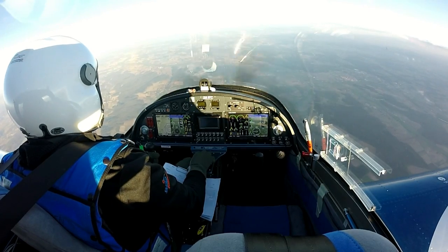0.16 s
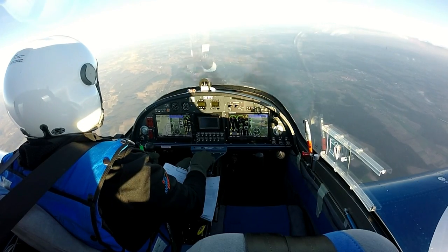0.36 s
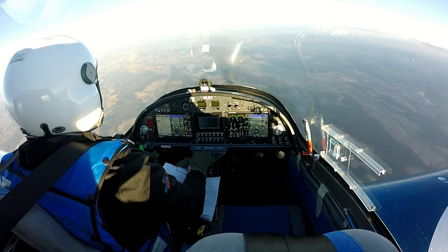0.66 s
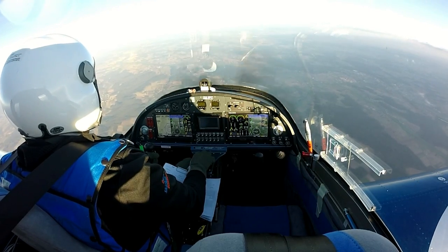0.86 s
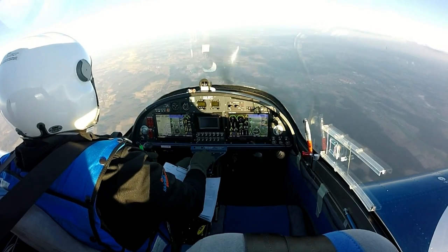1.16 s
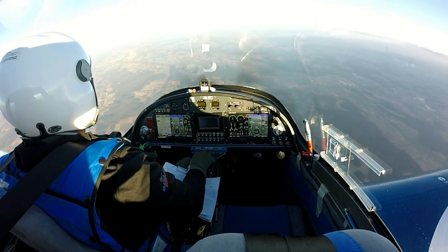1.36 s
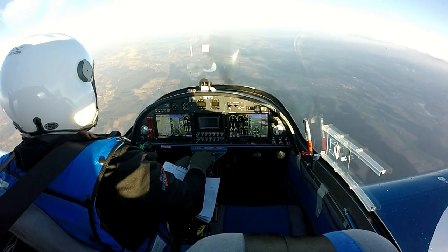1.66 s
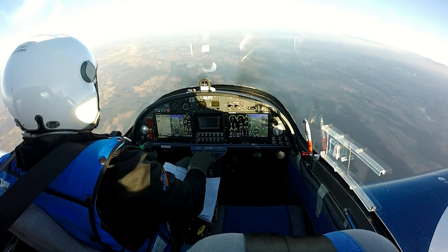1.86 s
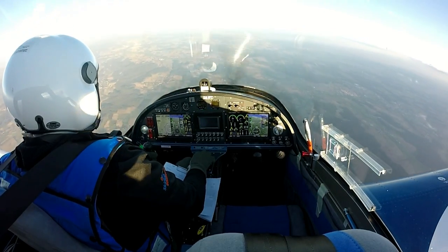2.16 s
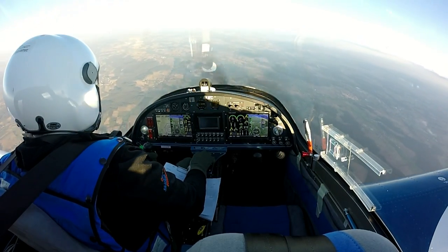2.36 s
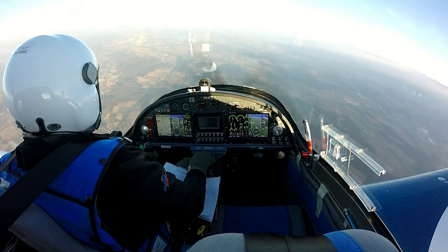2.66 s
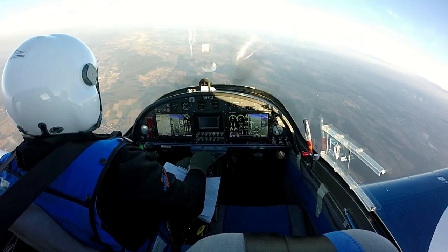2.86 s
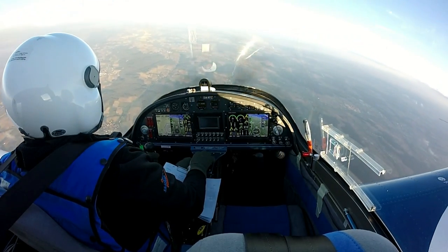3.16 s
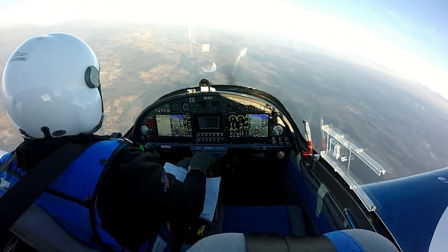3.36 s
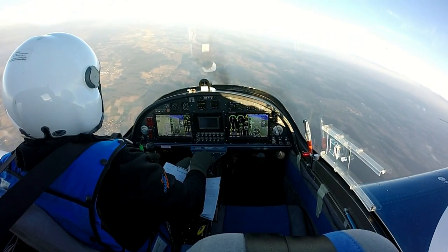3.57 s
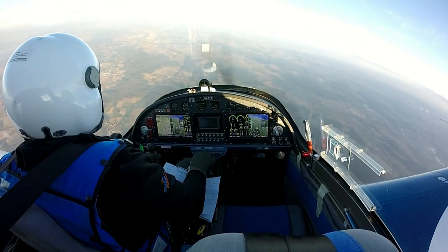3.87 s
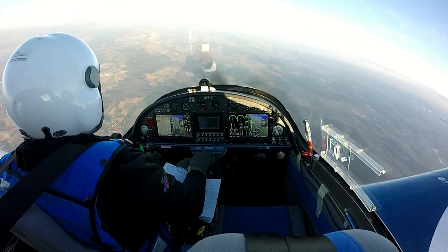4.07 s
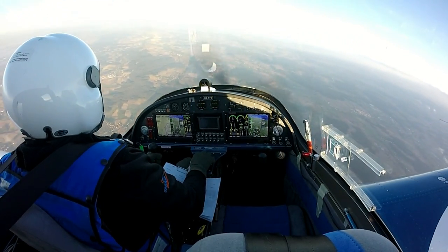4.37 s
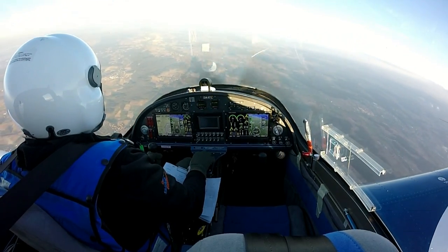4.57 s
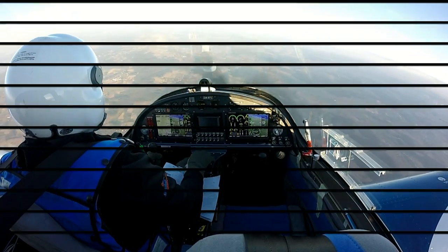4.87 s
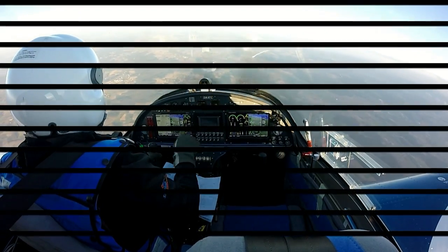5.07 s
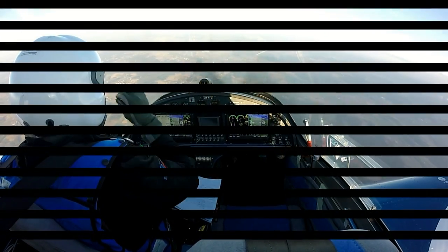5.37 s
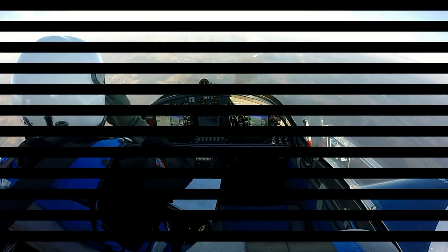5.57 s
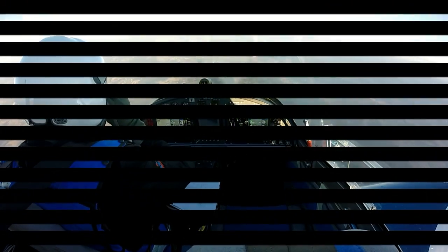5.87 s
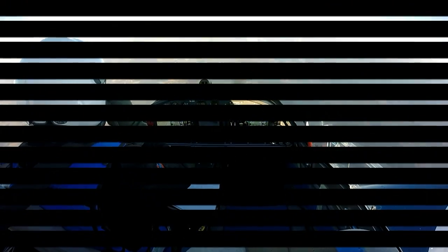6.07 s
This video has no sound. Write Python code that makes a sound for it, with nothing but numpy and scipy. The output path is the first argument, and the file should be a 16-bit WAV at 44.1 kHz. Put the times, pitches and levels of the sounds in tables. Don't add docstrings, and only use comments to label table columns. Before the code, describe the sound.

Inside a small propeller aircraft cockpit, a deep engine and propeller drone throbs under rushing air and low cabin rumble, then fades away.

```python
import sys
import numpy as np
from scipy import signal
from scipy.fft import rfft, irfft, next_fast_len
from scipy.io import wavfile
from scipy.ndimage import uniform_filter1d, minimum_filter1d

SR = 44100
rng = np.random.default_rng(int(sys.argv[2]) if len(sys.argv) > 2 else 0)


def volts(x):
    e = np.asarray(x, float) / 20
    return 10 ** e


def inscribe(sig):
    pcm = np.round(np.clip(np.atleast_2d(sig).T, -1, 1) * 32767)
    wavfile.write(sys.argv[1], SR, pcm.astype(np.int16))


N = 274690
SIZE = next_fast_len(N, True)

# time in seconds, blade-passing rate in Hz.
BLADE_RATE = [
    (0, 70.9),
    (.5, 71.2),
    (1.1, 71.8),
    (1.7, 71.9),
    (2.3, 72.5),
    (2.9, 73.1),
    (3.5, 73.6),
    (6.23, 73.8),
]
# frequency in Hz, density in dB per Hz.
AIR_LOW = [(20, -9.5), (32, -15), (50, -3), (62, 7), (88, 9.5), (105, -0.5), (130, 2), (165, -8.5),
           (190, -7.5), (330, -10.5), (390, -17), (600, -16.5)]
# frequency in Hz, density in dB per Hz.
AIR_HIGH = [(600, -19), (1000, -16.5), (1300, -21), (2300, -20.5), (2900, -29), (4100, -37.5),
            (6000, -36.5), (7200, -44), (8500, -51), (12000, -57.5), (14000, -63), (15000, -69.5)]
# centre in Hz, width in Hz, lift in dB.
CANOPY = [(255, 8.7, -3), (323, 33, 3), (547, 23, -5.5), (723, 45, -5.5), (751, 18, 6.5), (780, 28, -7.5),
          (1014, 45, 4.5), (1080, 50, -3.5), (1650, 350, 2.5), (1955, 140, -3.5), (2152, 100, 3),
          (3333, 280, 8), (4684, 160, 6), (5870, 300, 1.5), (13400, 600, 5)]
# time in seconds, depth in dB, fall and return in seconds.
LULLS = [(0, -9, .01, 0.23), (.28, -13, 0.056, 0.096), (.42, -6.5, 0.078, 0.067), (.55, -5, 0.095, 0.052),
         (.68, -8, 0.052, 0.032), (.76, -8, 0.035, 0.065), (.99, -9, 0.062, 0.041),
         (1.3, -7.5, 0.096, 0.095), (1.51, -5, 0.071, 0.053), (1.63, -19, 0.045, 0.058),
         (1.75, -17, 0.064, 0.037), (1.91, -13, 0.076, 0.06), (2.05, -2.5, 0.08, 0.33),
         (2.64, -0.5, 0.069, 0.13), (3.05, -8.5, 0.076, 0.055), (3.27, -3.5, 0.057, 0.056),
         (3.36, -6, 0.042, 0.12), (3.61, -6, 0.085, 0.085), (3.82, -3, 0.052, 0.22),
         (4.09, -5, 0.053, 0.088), (4.29, -3.5, .13, 0.087), (4.6, -3, 0.057, 0.035),
         (4.8, -3.5, 0.095, 0.084), (5.1, -1.5, .06, .06), (5.43, -9, .05, 0.084), (5.72, -3.5, 0.16, .08),
         (5.93, -5.5, 0.099, 0.046), (6.19, -2.5, 0.15, 0.031)]
# time in seconds, lift in dB,
# rise and drop in seconds.
LIFTS = [(0, 7.5, .01, 0.23), (.3, 5, 0.059, 0.14), (.48, 5.5, 0.11, 0.056), (.62, 7.5, .13, 0.02),
         (.8, 4, 0.27, 0.14), (1.02, 5, 0.061, 0.28), (1.34, 4.5, 0.11, 0.21), (1.78, 7, 0.39, 0.042),
         (1.93, 6.5, 0.11, 0.22), (2.13, 4.5, 0.093, 0.052), (2.31, 2, .12, 0.085), (2.46, 3, 0.051, 0.081),
         (2.62, -2, 0.088, .06), (2.8, 4, 0.13, .04), (2.92, 1.5, .1, 0.18), (3.09, 7.5, 0.059, .04),
         (3.45, 7, 0.22, 0.22), (3.63, 8, 0.11, 0.097), (3.75, 6.5, 0.12, 0.055), (3.84, 6.5, 0.046, 0.098),
         (3.95, 5.5, 0.1, 0.056), (4.13, 3.5, 0.12, 0.11), (4.38, 7, 0.14, 0.024), (4.65, 3.5, 0.23, 0.019),
         (4.85, 4.5, 0.085, 0.11), (5.1, 2, 0.27, .35), (5.49, 7, 0.1, 0.092), (5.78, 2.5, 0.33, 0.042),
         (5.96, 5, 0.068, 0.033), (6.12, -1.5, 0.36, .3)]
# time in seconds, lift in dB, rise and decay in seconds.
THUMPS = [(.07, 15.5, .07, 0.17), (.5, 7, 0.34, 0.22), (.78, 10.5, 0.25, 0.15), (1.06, 10, 0.19, 0.43),
          (1.44, 11.5, .06, .06), (1.54, 14, 0.072, .06), (1.67, 13.5, .05, .3), (1.92, 12, 0.12, .12),
          (2.12, 14, 0.12, 0.042), (2.25, 8, .04, .05), (2.36, -4, .06, .05), (2.5, 8.5, .1, 0.12),
          (2.7, -5, .08, .04), (2.78, 12.5, 0.043, 0.084), (2.96, 8, .04, 0.085), (3.09, 10.5, 0.071, .13),
          (3.4, 18.5, .14, 0.11), (3.63, 17.5, 0.099, 0.16), (3.87, 10, 0.046, 0.11),
          (3.97, 10.5, 0.12, 0.076), (4.15, 15.5, .06, 0.19), (4.41, 7, .04, .3), (4.83, 7.5, .05, .22),
          (5.1, 11, .04, 0.13), (5.5, 16, 0.29, .04), (5.63, 11.5, .04, 0.2)]

RUSH_DB = -43


def curve(table, column=1):
    rows = np.array(table)
    return np.interp(np.arange(N) / SR, rows[:, 0], rows[:, column])


def walk(rate):
    hold = int(SR / rate)
    levels = np.repeat(rng.standard_normal(N // hold + 1), hold)
    return 1.1 * uniform_filter1d(uniform_filter1d(levels, hold), hold)[:N]


def unit(x):
    return x / np.sqrt(np.mean(x ** 2))


def ring(hz, width_hz):
    f = np.fft.rfftfreq(SIZE, 1 / SR)
    resonance = 1 / (1 + (2 * (f - hz) / width_hz) ** 2)
    return unit(irfft(rfft(rng.standard_normal(SIZE)) * resonance, SIZE)[:N])


def tone(hz):
    return np.sqrt(2) * np.cos(2 * np.pi * (np.cumsum(hz) / SR + rng.random()))


def steady(x, share):
    power = uniform_filter1d(x ** 2, SR // 30)
    return unit(x / (power + .02) ** (share / 2))


def swells(rows):
    t = np.arange(N) / SR
    return sum(db * np.interp(t, [s - up, s, s + down], [0, 1, 0]) for s, db, up, down in rows)


def speedup():
    return curve(BLADE_RATE) - BLADE_RATE[0][1]


def slow_gain():
    return uniform_filter1d(swells(LIFTS), size=SR // 2)


def airflow():
    f = np.fft.rfftfreq(SIZE, 1 / SR)[1:]
    colour = np.array(AIR_LOW + AIR_HIGH[1:])
    db = np.interp(np.log(f), np.log(colour[:, 0]), colour[:, 1])
    db = db + sum(lift / (1 + (2 * (f - hz) / width) ** 2) for hz, width, lift in CANOPY)
    noise = rfft(rng.standard_normal(SIZE))[1:] * volts(db)
    midrange = noise[(f > 500) & (f < 7000)]
    noise = noise / np.sqrt(2 * np.sum(np.abs(midrange) ** 2)) * SIZE

    eddy, flutter, seals = walk(5), walk(30), walk(40)
    buffet_db = 0.7 - 0.6 * speedup()
    rush = 0
    for octave in np.arange(4, 14.6, .5):
        away = np.clip(2 * (np.log2(f) - octave), -1, 1)
        band = irfft(np.append(0, noise * np.cos(away * np.pi / 2) ** 2), SIZE)[:N]
        eddy = .8 * eddy + .6 * walk(5)
        band_db = .4 * eddy + .6 * flutter + 0.89 * walk(15)
        if octave < 8.8:
            band_db = band_db + buffet_db
        if octave > 12.8:
            band_db = band_db + 0.8 * seals
        rush = rush + band * volts(band_db)
    return rush * volts(RUSH_DB + swells(LIFTS))


def cabin_boom():
    boom_db = -38.5
    level_db = uniform_filter1d(boom_db + swells(THUMPS), size=1500) - 1.0
    return volts(level_db) * steady(ring(146, width_hz=19.1), share=.5)


def engine():
    gear_ratio = 2.43
    shaft_hz = curve(BLADE_RATE) / 3 * gear_ratio * (1 + 0.00073 * walk(2.7))
    firing_db = -27.5 - 3.5 * speedup() + 1.1 * walk(9)
    shaft_db = -33 + 2.0 * (slow_gain() - 4.5) + 3.4 * walk(8.9)
    return volts(firing_db) * tone(2 * shaft_hz) + volts(shaft_db) * tone(shaft_hz)


def propeller():
    blade_hz = curve(BLADE_RATE) * (1 + 0.0022 * walk(7.03))
    beat = steady(unit(tone(blade_hz) + volts(-10.5) * ring(73, width_hz=17)), share=0.88)
    octave = volts(-26.5) * tone(2 * blade_hz)
    blade_db = -19 + 0.5 * speedup() + swells(LULLS) + 0.29 * walk(22)
    throb_db = -11.5 + 1.5 * walk(4.4) + RUSH_DB + slow_gain()
    throb = volts(throb_db) * tone(blade_hz / 3)
    return (beat + octave) * volts(blade_db) + throb


def scene():
    t = np.arange(N) / SR
    opening = np.clip(t / .001, 0, 1)
    fade_from_s, fade_length_s = 4.725, 2.04
    fade = np.clip(1 - (t - fade_from_s) / fade_length_s, 0, 1)
    cockpit = airflow() + cabin_boom() + engine() + propeller()
    return (opening * fade * cockpit)[None]


def top_cut(x):
    return signal.sosfilt(signal.butter(12, 15020, fs=SR, output="sos"), x)


def record(dry):
    room_left = np.minimum(1, volts(-10.0) / (np.abs(dry) + 1e-9))
    gain = uniform_filter1d(minimum_filter1d(room_left, size=900), size=600)
    limited = dry * gain ** 0.76
    return top_cut(limited)


dry = scene()
out = record(dry)
inscribe(out)
```